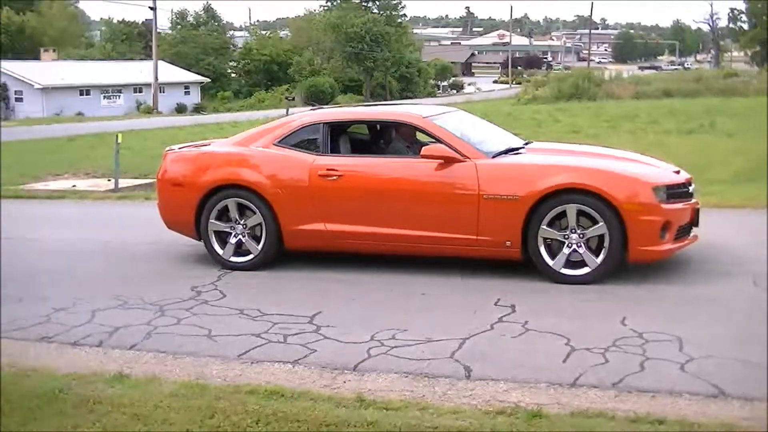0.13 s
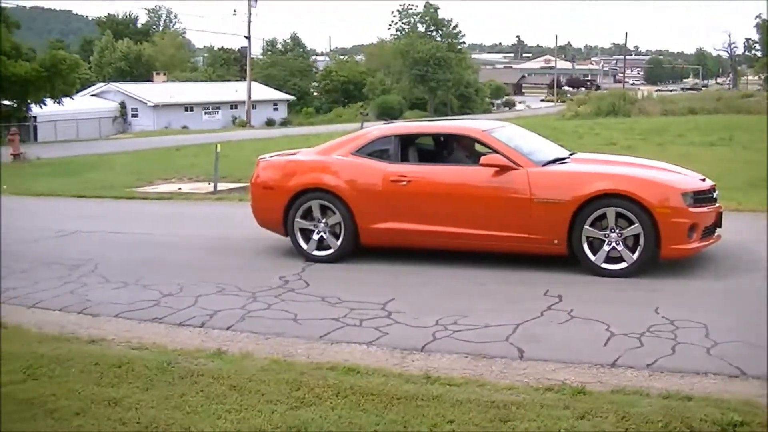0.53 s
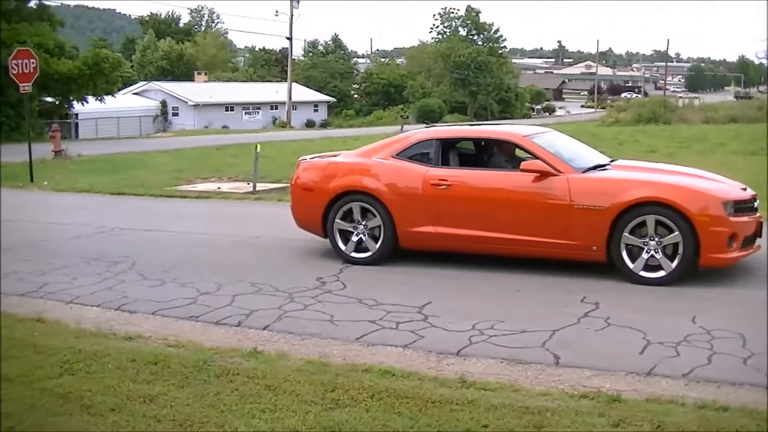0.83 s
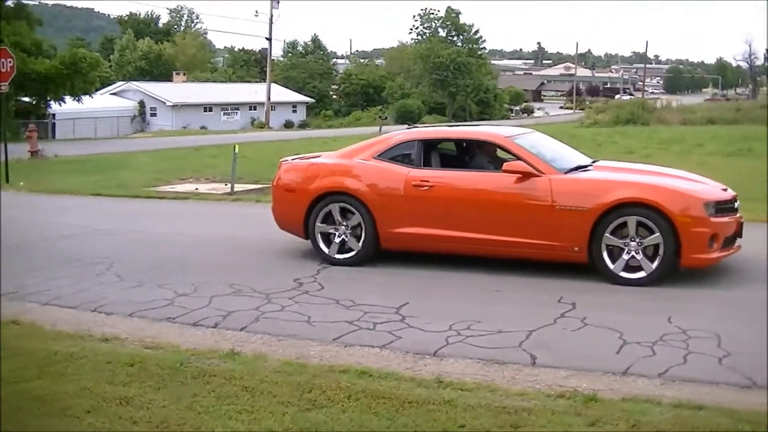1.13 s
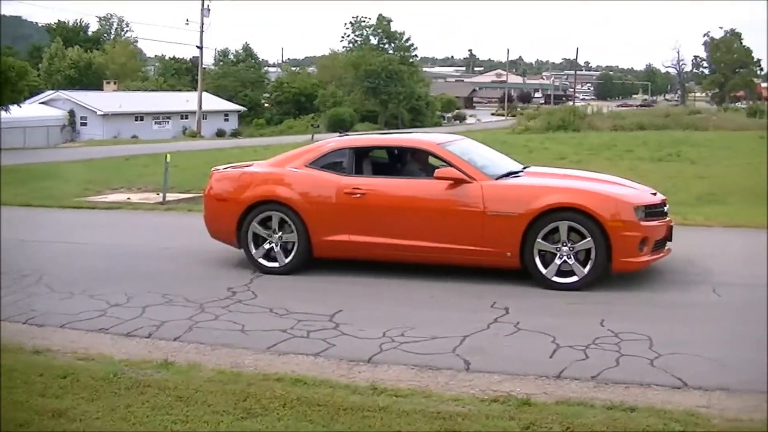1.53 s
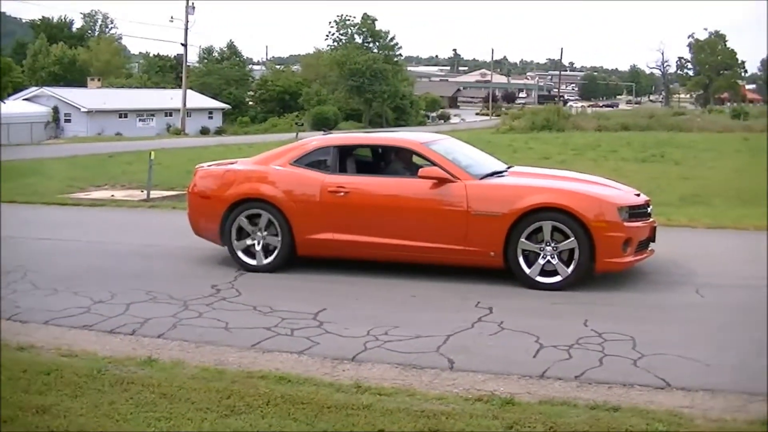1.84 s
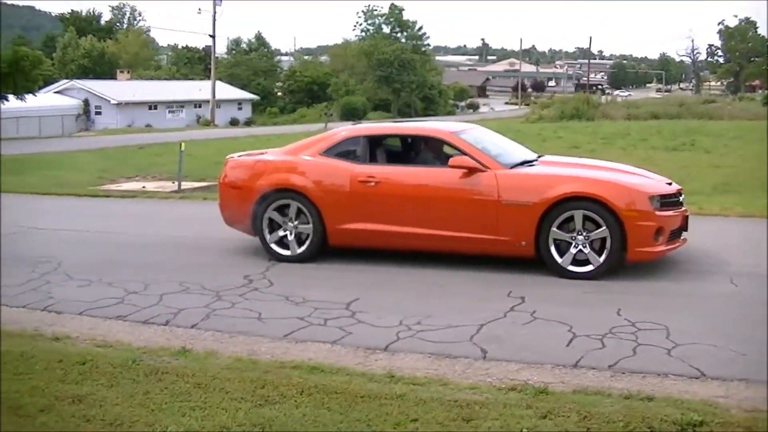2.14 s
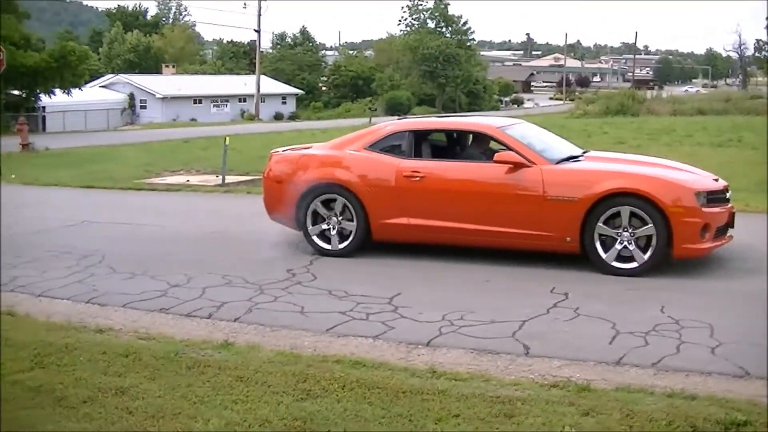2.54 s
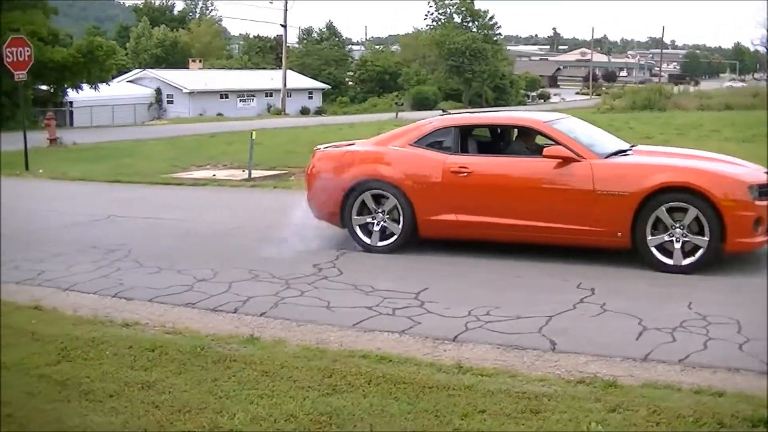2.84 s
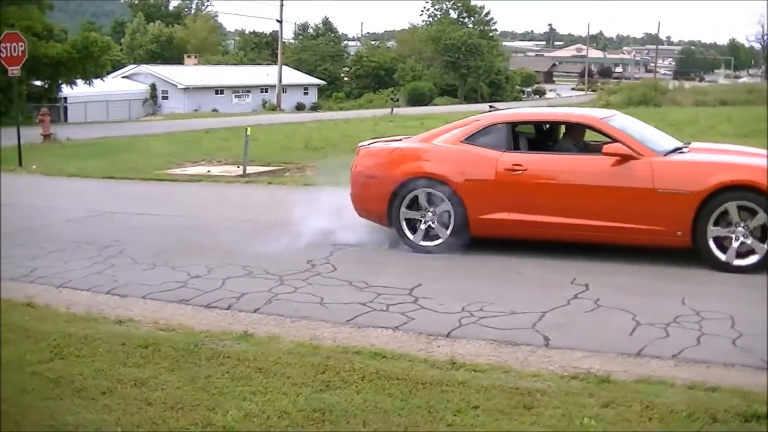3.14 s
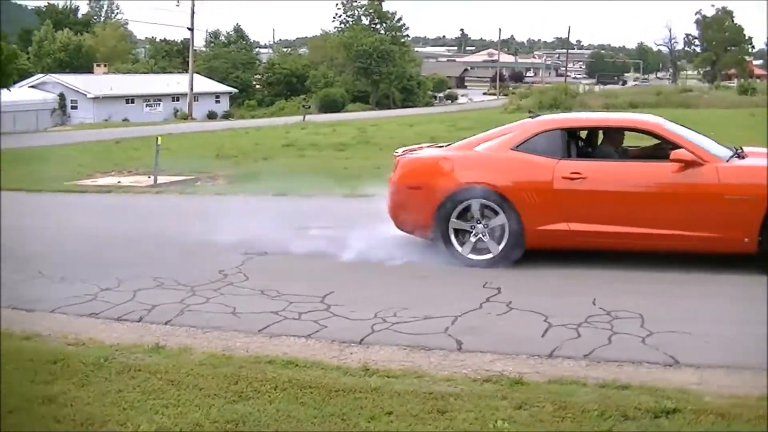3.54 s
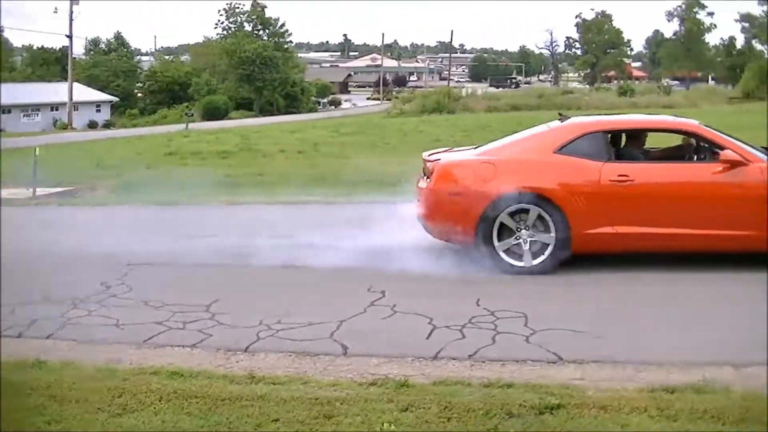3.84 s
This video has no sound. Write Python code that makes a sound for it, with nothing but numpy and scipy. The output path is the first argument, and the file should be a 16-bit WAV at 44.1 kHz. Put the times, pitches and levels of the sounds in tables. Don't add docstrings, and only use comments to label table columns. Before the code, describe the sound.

A powerful car idles faintly outdoors, then revs hard after about a second; rear tyres break into rough, chirping squeal over gritty scrub, continuing to the end, heard by a small roadside camera microphone.

```python
import sys
import numpy as np
from scipy import signal
from scipy.fft import rfft, irfft
from scipy.io import wavfile

SR = 44100
rng = np.random.default_rng(int(sys.argv[2]) if len(sys.argv) > 2 else 0)


def level_to_linear(level):
    exponent = np.asarray(level, float) / 20
    return 10 ** exponent


def generate_wav(signal):
    frames = np.transpose(np.atleast_2d(signal))
    scaled = np.clip(frames, -1, 1) * 32767
    pcm = np.round(scaled).astype(np.int16)
    wavfile.write(sys.argv[1], SR, pcm)


N = 176400

# frequency in Hz, density in dB per Hz.
AMBIENT_SPECTRUM = [(50, -37), (120, -17), (360, -5.5), (660, -14.5), (1100, -6.5), (2000, -11),
                    (4000, -23), (15500, -39)]
# start in seconds, peak in dB.
HANDLING_TICKS = [
    (0.3622, -15.5),
    (0.413, -26),
    (.428, -34),
]
# frequency in Hz, level in dB, T60 in seconds.
SHELL_MODES = [(1550, -19, .008), (2920, -2, 0.016), (3660, 6.5, 0.011), (4620, 0, .005), (5480, 2.5, .005),
               (6440, -3, .006), (8900, -16, .003)]
# time in seconds, level in dB.
INTAKE_LEVEL = [(.45, -67), (.68, -48), (.85, -50), (.95, -39.5), (1.03, -33.5), (1.07, -44), (1.12, -32),
                (2.1, -31), (2.25, -41.5), (3, -41), (4, -59)]
# frequency in Hz, width in Hz, level in dB.
DUCT_MODES = [(4330, 560, 6.5), (5940, 400, 7), (6500, 330, 6), (7770, 420, 5.5), (8900, 270, 4),
              (9780, 860, -1), (11900, 3000, -11)]
# time in seconds, firing rate in Hz.
FIRING_RATE = [(0.7, 60.24), (0.9, 67.7), (1.0, 90.3), (1.1, 114), (1.25, 131.5), (1.5, 149.2), (1.65, 158),
               (1.9, 172.0), (2.0, 178.6), (2.2, 191.3), (2.55, 221), (2.8, 283.4), (3.2, 378), (3.4, 398),
               (3.58, 412), (3.72, 411.5), (3.85, 358.5), (4.0, 291)]
# time in seconds, exhaust level in dB.
EXHAUST_LEVEL = [(.16, -66), (.55, -52.5), (.89, -36), (.93, -28), (1.2, -27), (1.6, -28.5), (2.0, -28),
                 (2.4, -31), (2.8, -27), (3.2, -29.5), (3.7, -26.5), (3.88, -22.5), (4, -25.5)]
# multiple of the four-stroke cycle rate, level in dB at low, at middle and
# at full revs, change in dB off throttle.
EXHAUST_ORDERS = [(2, -58, -42, -27, -5), (3, -52, -30, -12, -18), (4, -44, -38, -22, 5),
                  (5, -31, -18, -14, -3), (6, -36, -22, -22, 5), (7, -35, -17, -11, -9),
                  (8, -13, -9, -5, 3), (9, -22, -18, -6, -7), (10, -22, -11, -15, -1),
                  (11, -18, -14, -14, -5), (12, -24, -11, -13, 3), (13, -23, -17, -19, 3),
                  (14, -21, -10, -21, 3), (15, -21, -21, -20, 0), (16, -2.5, -17, -12, -10),
                  (17, -18, -14, -26, 0), (18, -10, -9, -32, 0), (19, -22, -14, -32, 0),
                  (20, -13, -14, -32, 0), (21, -16, -15, -34, 0), (23, -19, -18, -34, 0),
                  (24, -13, -22, -34, 0)]
# frequency in Hz, density in dB per Hz.
PUFF_SPECTRUM = [(70, -48), (110, -37), (200, -6.5), (370, 4), (480, 4), (600, -5), (1100, -21),
                 (3000, -54)]
# centre in seconds, length in seconds, frequency in Hz, level in dB.
BODY_BOOMS = [(.95, .04, 376, -32), (1.05, .035, 372, -29), (1.04, .05, 310, -34), (1.3, .07, 420, -34),
              (1.47, .05, 468, -34), (1.7, .03, 482, -33), (2.08, .08, 478, -30), (2.45, .08, 495, -34),
              (2.6, .05, 505, -37), (2.78, .05, 480, -35)]
# time in seconds, squeal level in dB, squeal pitch in Hz, scrub level in dB.
TYRE_SLIP = [(.5, -51, 1184, -51.5), (.87, -40, 1220, -43), (.98, -29.5, 1175, -36),
             (1.025, -31, 1200, -25.5), (1.07, -34, 1200, -37.5), (1.13, -24.5, 1186, -29.5),
             (1.45, -18.5, 1127, -27.5), (1.62, -20, 1016, -27.5), (1.95, -17.5, 1171, -29),
             (2.2, -17.5, 1212, -28.5), (2.4, -20, 1078, -31.5), (2.7, -18, 1225, -30),
             (2.9, -18, 1098, -29), (3.15, -18.5, 1101, -27.5), (3.4, -17, 1178, -25.5),
             (3.65, -19.5, 1270, -26.5), (3.8, -18.5, 1148, -25.5), (4, -19.5, 1086, -29)]
# frequency in Hz, density in dB per Hz.
TREAD_SPECTRUM = [(600, -23), (820, -8.5), (920, -1), (1150, -1.5), (1400, 0.5), (1700, -10.5),
                  (2300, -17.5), (3000, -15)]
# frequency in Hz, density in dB per Hz.
SCRUB_SPECTRUM = [(720, -4), (1000, 3.5), (1600, -0.5), (3000, 0.5), (4500, -7), (7000, -13),
                  (11000, -21.5), (15500, -37.5)]
# centre in seconds, lift of the squeal in dB.
TREAD_GRABS = [(1.964, 1.5), (2.463, 4), (2.505, 3.5), (3.14, 4), (3.215, 3), (3.42, 1), (3.645, 2)]
# centre in seconds, pitch in Hz, level in dB.
BLOCK_CHIRPS = [(1.596, 1030, -24), (1.721, 1114, -18), (1.811, 1052, -17.5), (1.901, 1082, -24),
                (1.951, 1350, -26), (1.966, 1168, -24), (2.02, 1205, -25.0), (2.09, 1350, -38),
                (2.095, 1071, -17.5), (2.14, 1292, -20.5), (2.18, 1156, -32), (2.195, 923.7, -24),
                (2.27, 1323, -21), (2.28, 1026, -24), (2.35, 1092, -21), (2.355, 1253, -22.5),
                (2.4, 1049, -15.5), (2.464, 1134, -19.5), (2.479, 1417, -27), (2.504, 1155, -15),
                (2.549, 1145, -25), (2.679, 1087, -18), (2.804, 1079, -21), (2.844, 1390, -35),
                (2.854, 1038, -32), (3.053, 1087, -15), (3.073, 1403, -23), (3.138, 1089, -19),
                (3.193, 1433, -25.0), (3.253, 938, -34), (3.253, 1210, -25.0), (3.347, 1117, -18),
                (3.417, 1131, -36), (3.427, 958, -30), (3.507, 1248, -21), (3.512, 1415, -25),
                (3.532, 1143, -18.5), (3.627, 1399, -21), (3.647, 1222, -22), (3.717, 1130, -22),
                (3.826, 1222, -21.5), (3.841, 1047, -25.0), (3.906, 1135, -29), (3.911, 926, -27),
                (2.765, 3030, -30), (2.804, 1937, -27), (2.86, 3090, -33), (2.944, 3052, -27),
                 (2.973, 2196, -25.5), (3.198, 2360, -30), (3.223, 2153, -35), (3.292, 2320, -27),
                 (3.322, 3240, -30), (3.452, 2320, -27), (3.457, 2830, -32), (3.487, 1916, -31),
                 (3.637, 3200, -33), (3.647, 2780, -28), (3.761, 2820, -35.0), (3.766, 1910, -27),
                 (3.847, 2810, -39), (3.861, 2976, -30)]
# frequency in Hz, width in Hz, depth in dB.
HOUSING_DIPS = [(661, 37.5, -8.5), (2010, 480, -1.5), (2693, 260, -7.5), (3717, 470, -7), (5340, 820, -5.5),
                (6300, 420, -4.5), (7490, 300, -2), (8460, 550, -2), (9600, 380, -1), (12100, 360, 0)]


def rms_one(x):
    return x / np.sqrt(np.mean(x ** 2) + 1e-20)


def in_time(rows):
    s, *columns = np.transpose(rows)
    return [np.interp(np.arange(N) / SR, s, c) for c in columns]


def at_hz(points, hz):
    point_hz, point_db = np.array(points).T
    return np.interp(np.log(hz), np.log(point_hz), point_db)


def bump(centre_s, width_s):
    return np.exp(-.5 * ((np.arange(N) / SR - centre_s) / width_s) ** 2)


def drift(rate_hz):
    r = np.exp(-80 * np.pi * rate_hz / SR)
    noise = rng.standard_normal(N // 40 + 2002)
    slow = signal.lfilter([1], [1, -2 * r, r * r], noise)[2000:]
    return np.interp(np.arange(N) / 40, np.arange(len(slow)), rms_one(slow - slow.mean()))


def colour(x, spectrum, shared_db, own_db, rate_hz):
    hz = np.arange(N // 2 + 1) * SR / N + 1
    low_hz, high_hz = spectrum[0][0], spectrum[-1][0]
    octaves_beyond = np.maximum(np.log2(low_hz / hz), 0) + np.maximum(np.log2(hz / high_hz), 0)
    shaped = rfft(x) * level_to_linear(at_hz(spectrum, hz) - 15.8 * octaves_beyond)
    out, together, place = 0, drift(rate_hz / 2), 2 * np.log2(hz)
    for k in range(int(2 * np.log2(low_hz)) - 1, int(2 * np.log2(high_hz)) + 3):
        band = np.cos(np.pi / 2 * np.clip(place - k, -1, 1)) ** 2
        flicker_db = shared_db * together + own_db * drift(rate_hz)
        out = out + irfft(shaped * band, N) * level_to_linear(flicker_db)
    return rms_one(out)


def surroundings():
    noise = rng.standard_normal(N)
    return level_to_linear(-39.5) * colour(noise, AMBIENT_SPECTRUM, shared_db=1, own_db=1.2, rate_hz=20)


def ticks():
    bounce_s = .0011
    out = np.zeros(N)
    for hz, level_db, t60_s in SHELL_MODES:
        clicks = np.full(N, 1e-18)
        for s, db in HANDLING_TICKS:
            clicks[int(s * SR)] += level_to_linear(db + level_db - 6)
            clicks[int((s + bounce_s) * SR)] -= level_to_linear(db + level_db - 8)
        r, w = level_to_linear(-60 / (t60_s * SR)), 2 * np.pi * hz / SR
        out += signal.lfilter([0, np.sin(w)], [1, -2 * r * np.cos(w), r * r], clicks)
    return signal.sosfilt(signal.butter(2, [900, 7000], "band", fs=SR, output="sos"), out)


def intake():
    air, out = rng.standard_normal(N), 0
    for k, (hz, width_hz, db) in enumerate(DUCT_MODES):
        r = np.exp(-np.pi * width_hz / SR)
        ring = signal.lfilter([1, 0, -1], [1, -2 * r * np.cos(2 * np.pi * hz / SR), r * r], air)
        gain = level_to_linear(db + 0.88 * drift(9.1)) * (1 - r * r) / 2
        out = out + (-1) ** k * gain * ring
    level_db = in_time(INTAKE_LEVEL)[0] + 2.0 * drift(15.4)
    return level_to_linear(level_db) * rms_one(out)


def exhaust_orders(firing_hz, cycle_hz, turn):
    low_hz, middle_hz, full_hz = 145, 205, 395
    lift_off_s, lift_s = 3.72, .12
    cancel_hz, cancel_width_hz, cancel_db = 170, 12.6, -6.5
    idle_hz, idle_db, wander_db = 63, -22, 1.2
    lifted = np.clip((np.arange(N) / SR - lift_off_s) / lift_s, 0, 1)
    tones = 0
    for k, low_db, middle_db, full_db, lift_db in EXHAUST_ORDERS:
        db = np.interp(firing_hz, [low_hz, middle_hz, full_hz], [low_db, middle_db, full_db])
        db += lift_db * lifted
        db += cancel_db * np.exp(-.5 * ((k * cycle_hz - cancel_hz) / cancel_width_hz) ** 2)
        unsteady = 1 + (k > 9 and k % 8 > 0)
        db += wander_db * unsteady * drift(4)
        db += idle_db * np.clip((idle_hz + 4 * min(k, 16) - firing_hz) / 30, 0, 1)
        tones = tones + level_to_linear(db) * np.sin(k * turn + rng.uniform(0, 2 * np.pi))
    return np.sqrt(2) * level_to_linear(-.5) * tones


def exhaust_puffs(firing_hz, turn):
    gate = 1 + .5 * np.cos(8 * turn) + .3 * np.cos(3 * turn)
    puffs = colour(gate * rng.standard_normal(N), PUFF_SPECTRUM, shared_db=0.2, own_db=2, rate_hz=12)
    clear_db = -13 * np.clip((firing_hz - 72.5) / 395, 0, 1)
    return level_to_linear(-2.5 + clear_db) * puffs


def body_booms():
    out = 0
    for s, length_s, hz, db in BODY_BOOMS:
        level = level_to_linear(db + 2 * drift(29)) * bump(s, length_s)
        phase = 2 * np.pi * np.cumsum(hz * (1 + 0.004 * drift(18))) / SR
        out = out + level * np.sin(phase)
    return out


def exhaust():
    (firing_hz,), (load_db,) = in_time(FIRING_RATE), in_time(EXHAUST_LEVEL)
    cycle_hz = firing_hz / 8 * (1 + .0015 * drift(6))
    turn = 2 * np.pi * np.cumsum(cycle_hz) / SR
    pulses = exhaust_orders(firing_hz, cycle_hz, turn) + exhaust_puffs(firing_hz, turn)
    return level_to_linear(load_db) * pulses + body_booms()


def grabs_db():
    return sum(db * bump(s, .0035) for s, db in TREAD_GRABS)


def chirps():
    rise_per_s, wobble, flutter_db = .5, .011, 2
    out, t = 0, np.arange(N) / SR
    wobbles = [drift(30) for _ in range(4)]
    flutters = [drift(45) for _ in range(4)]
    for k, (s, hz, db) in enumerate(BLOCK_CHIRPS):
        bend = wobble * wobbles[k % 4] + rise_per_s * (t - s)
        phase = 2 * np.pi * np.cumsum(hz * (1 + bend)) / SR
        level = level_to_linear(db - 1.5 + flutter_db * flutters[k % 4]) * bump(s, .018)
        out = out + level * np.sin(phase)
    return np.sqrt(2) * out * level_to_linear(grabs_db())


def singing_blocks(squeal_hz):
    spread, wobble, burst_db, second_db, third_db = .1, .016, 3, -12, -31
    sing = 0
    for offset in np.linspace(-2, 3, 11):
        block_hz = squeal_hz * (1 + spread * offset + wobble * drift(28.6))
        phase = 2 * np.pi * np.cumsum(block_hz) / SR
        burst = level_to_linear(burst_db * drift(24) - 3 * abs(offset))
        tone = np.sin(phase) + level_to_linear(second_db) * np.sin(2 * phase) + level_to_linear(third_db) * np.sin(3 * phase)
        sing = sing + burst * tone
    return rms_one(sing)


def asphalt_scrub():
    grit_per_s, grit_share = 2500, .2
    hits = rng.random(N) < grit_per_s / SR
    hit_db = 3 * np.minimum(rng.exponential(1, N), 4)
    grit = hits * level_to_linear(hit_db) * rng.choice([-1, 1], N)
    friction = np.sqrt(grit_share) * rms_one(grit) + np.sqrt(1 - grit_share) * rng.standard_normal(N)
    return colour(friction, SCRUB_SPECTRUM, shared_db=0.73, own_db=1.5, rate_hz=17.0)


def tyres():
    squeal_db, squeal_hz, scrub_db = in_time(TYRE_SLIP)
    rubber = colour(rng.standard_normal(N), TREAD_SPECTRUM, shared_db=1.5, own_db=1.0, rate_hz=43)
    squeal = level_to_linear(-4) * singing_blocks(squeal_hz) + level_to_linear(-3.5) * rubber
    return level_to_linear(squeal_db + grabs_db()) * squeal + level_to_linear(scrub_db + 4.5) * asphalt_scrub()


def scene():
    return (surroundings() + ticks() + intake() + exhaust() + chirps() + tyres())[None]


def top_cut(x):
    return signal.sosfilt(signal.butter(12, 15680, fs=SR, output="sos"), x)


def record(dry):
    start_s, fade_s = 0.1577, 0.00085
    x = signal.sosfilt(signal.butter(6, 74, "high", fs=SR, output="sos"), dry)
    for hz, width_hz, depth_db in HOUSING_DIPS:
        g, w = level_to_linear(depth_db / 2), 2 * np.pi * hz / SR
        q = np.tan(np.pi * width_hz / SR)
        zeros = [1 + q * g, -2 * np.cos(w), 1 - q * g]
        poles = [1 + q / g, -2 * np.cos(w), 1 - q / g]
        x = signal.lfilter(zeros, poles, x)
    x = x * np.clip((np.arange(N) / SR - start_s) / fade_s, 0, 1)
    return top_cut(x)


dry = scene()
out = record(dry)
generate_wav(out)
```